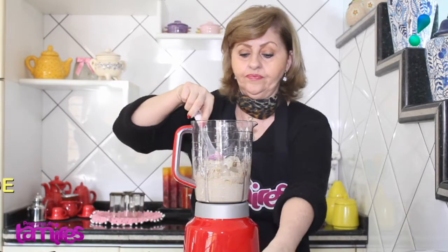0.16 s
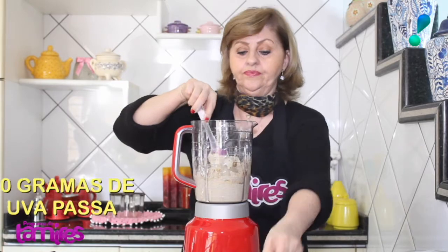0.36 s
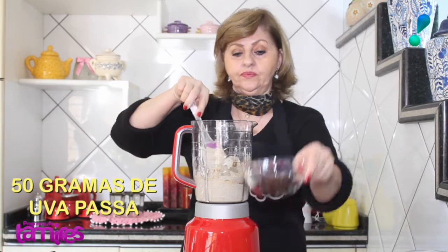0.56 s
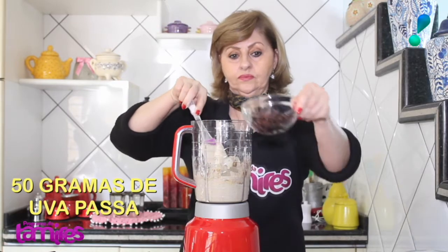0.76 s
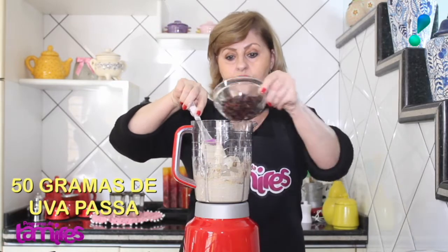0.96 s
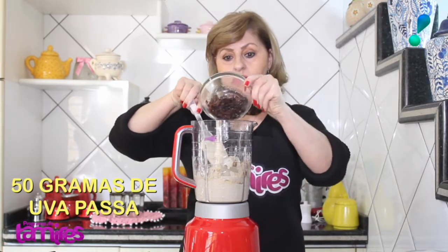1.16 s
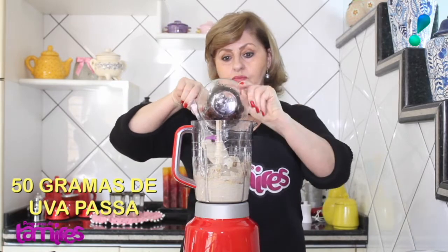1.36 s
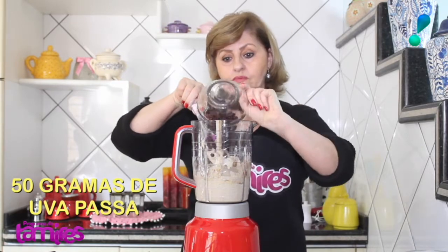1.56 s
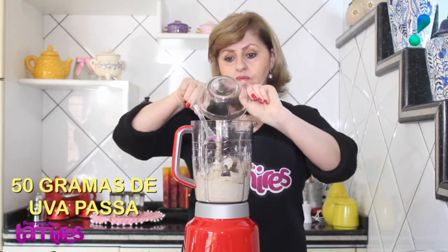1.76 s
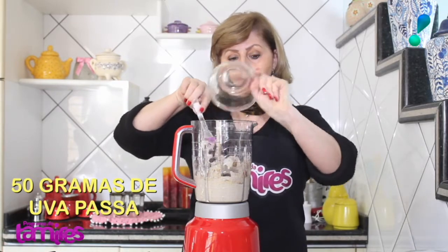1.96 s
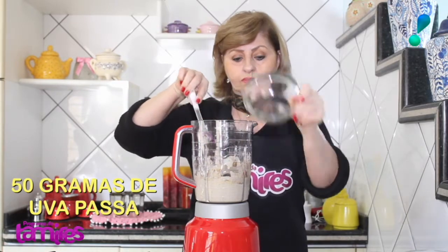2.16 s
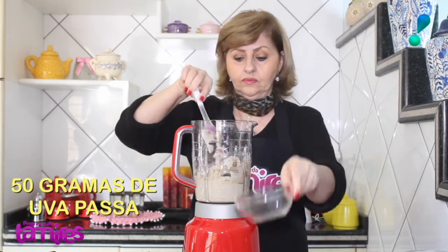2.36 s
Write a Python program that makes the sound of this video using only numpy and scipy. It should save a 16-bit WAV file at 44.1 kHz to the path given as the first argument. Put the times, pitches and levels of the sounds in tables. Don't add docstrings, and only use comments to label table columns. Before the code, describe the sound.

A glass bowl scrapes and rings off a kitchen counter, then a spatula knocks a blender jar

```python
import sys
import numpy as np
from scipy import signal
from scipy.fft import rfft, irfft
from scipy.io import wavfile
from scipy.ndimage import uniform_filter1d

SR = 44100
rng = np.random.default_rng(int(sys.argv[2]) if len(sys.argv) > 2 else 0)


def to_linear_factor(level_db):
    exponent = np.asarray(level_db, float) / 20
    return 10 ** exponent


def inscribe(sig):
    pcm = np.round(np.clip(np.atleast_2d(sig).T, -1, 1) * 32767)
    wavfile.write(sys.argv[1], SR, pcm.astype(np.int16))


N = 105840


def rms_one(x):
    return x / np.sqrt(np.mean(x ** 2) + 1e-20)


def at_hz(points, hz):
    table = np.array(points)
    return np.interp(np.log(hz), np.log(table[:, 0]), table[:, 1])


def shape(x, spectrum):
    hz = np.maximum(np.arange(N // 2 + 1) * SR / N, 1)
    return irfft(rfft(x) * to_linear_factor(at_hz(spectrum, hz)), N)


def colour(x, spectrum):
    return rms_one(shape(x, spectrum))


def butter(x, order, hz, kind="low"):
    return signal.sosfilt(signal.butter(order, hz, kind, fs=SR, output="sos"), x)


def stroke(rows):
    s, db = np.transpose(rows)
    return to_linear_factor(np.interp(np.arange(N) / SR, s, db, left=-200, right=-200))


def hits_at(times, levels_db):
    hits = np.zeros(N)
    hits[(times * SR).astype(int)] = to_linear_factor(levels_db)
    return hits


def die_away(hits, seconds):
    return signal.lfilter([1], [1, -np.exp(-1 / (seconds * SR))], hits + 1e-18)


def grit(per_s, spread_db):
    sizes = to_linear_factor(spread_db * np.minimum(rng.exponential(1, N), 5)) * rng.choice([-1, 1], N)
    return rms_one(sizes * (rng.random(N) < per_s / SR))


def ring(x, hz, t60):
    r = to_linear_factor(-60 / (t60 * SR))
    w = 2 * np.pi * hz / SR
    return signal.lfilter([0, np.sin(w)], [1, -2 * r * np.cos(w), r * r], x + 1e-18)


def ring_modes(x, modes, flip):
    return sum(to_linear_factor(db) * ring(x, hz, t60) * flip ** k for k, (hz, db, t60) in enumerate(modes))


def resonate(x, peaks):
    return sum(to_linear_factor(db) * rms_one(ring(x, hz, 2.2 / width)) * (-1) ** k
               for k, (hz, width, db) in enumerate(peaks))


def strike(times, levels_db, modes, scatter_db, flip=-1):
    out = np.zeros(N)
    vary = rng.standard_normal((len(times), 16))
    for k, (hz, db, t60) in enumerate(modes):
        hits = hits_at(times, levels_db + db + scatter_db * vary[:, k])
        out += ring(hits, hz, t60) * flip ** k
    return out


# (time [s], level [dB])
DRAG_PRESSURE = [(.2225, -59), (.2245, -28.5), (.23, -33.5), (.236, -23.5), (.246, -19), (.288, -14.5),
                 (.32, -24.5), (.425, -34.5), (.445, -49.5)]
# (time [s], level [dB])
DRAG_SPEED = [(.2225, -73.5), (.2245, -41.5), (.231, -47), (.236, -30.5), (.26, -37), (.29, -39.5),
              (.32, -46.5), (.37, -61), (.4, -70)]
# (frequency [Hz], density [dB])
PRESSURE_GRIT = [(60, -70.5), (130, -28), (300, -14.5), (600, -4), (1100, -2), (1650, 1), (2800, -10),
                 (5000, -31.5), (9000, -68.5)]
SPEED_GRIT = [(2000, -19), (3500, 10), (5500, -5), (7500, -21), (9000, -22), (12500, -32), (16000, -29.5)]
# (frequency [Hz], width [Hz], level [dB])
COUNTER = [(673, 53, -9.5), (1390, 36, -6.5), (1610, 190, -3), (1964, 73, -5.5), (2544, 41, -5.5),
           (2840, 29, -9.5), (3150, 84, -18), (3750, 91, -11)]
GLASS = [(5300, 110, -9), (7540, 180, -15.5), (4000, 250, -1)]
# (frequency [Hz], level [dB], t60 [s])
FIRST_TOUCH = [(2000, 1, 0.027), (1590, -14, 0.021)]


def drag():
    push, speed = stroke(DRAG_PRESSURE), stroke(DRAG_SPEED)
    slips, fine = grit(4000, spread_db=0.0), grit(9000, spread_db=4.5)
    rasp = push * to_linear_factor(-1) * colour(slips, PRESSURE_GRIT) + speed * colour(fine, SPEED_GRIT)
    counter = [(hz, 1.4 * width, db) for hz, width, db in COUNTER]
    counter_ring = np.std(push * slips) * to_linear_factor(-13.5) * resonate(push * slips, counter)
    glass_ring = np.std(speed * fine) * to_linear_factor(-4.5) * resonate(speed * fine, GLASS)
    touch = strike(np.array([.2178]), -30.5, FIRST_TOUCH, scatter_db=4.0)
    return rasp + counter_ring + glass_ring + butter(touch, 2, [1200, 2600], "band")


# (time [s], counter [dB], low counter [dB], glass [dB], rim tone [dB])
CATCHES = [(.2255, -23.5, -37, -58, -60.5), (.2338, -20, -27.5, -32.5, -51.5),
           (.2445, -13, -20.5, -35.5, -55.5), (.258, -18.5, -10, -43.5, -46),
           (.266, -20, -16, -52.5, -40.5), (.275, -16, -19, -50.5, -41.5), (.2825, -13, -19, -52, -45),
           (.286, -10, -19, -47.5, -43), (.297, -13.5, -24, -53.5, -59), (.312, -11.5, -25.5, -54, -57),
           (.324, -24, -19.5, -61, -49), (.336, -17.5, -21, -61.5, -43), (.359, -17.5, -27.5, -73, -68),
           (.383, -37.5, -25, -76, -85), (.404, -38, -23, -68, -68.5), (.42, -36.5, -36, -60, -67)]
# (frequency [Hz], level [dB], t60 [s])
SLAB = [(1388, 2, .05), (1612, 0.5, .06), (2074, -5, .05), (2570, -9.5, 0.04), (2840, -9.5, .06),
        (3150, -12, .03)]
SLAB_LOW = [(543.6, -6, 0.11), (654.3, -3.5, .07), (827, -1, .08), (960, -2, 0.051), (1120, -3, 0.042)]
SHEEN = [(9710, -0.5, .016), (10300, 1.5, 0.016), (11100, -5.5, .008), (13300, -8.5, .012),
         (14300, -13, .01), (15200, -3.5, .016)]
RIM_TONE = [(6260, 1, .09), (6540, -3.5, .07)]


def catches():
    s, slab_db, low_db, glass_db, tone_db = np.transpose(CATCHES)
    slab = strike(s, slab_db - 6.5, SLAB, scatter_db=5.0)
    slab = slab + strike(s, low_db - 5, SLAB_LOW, scatter_db=2.5)
    chatter = grit(6000, spread_db=6.5) * die_away(hits_at(s, glass_db - 22.5), seconds=0.014)
    glass = ring_modes(chatter, SHEEN, flip=1) + strike(s, tone_db - 3.5, RIM_TONE, scatter_db=4.5)
    return butter(slab, 2, [450, 3600], "band") + butter(glass, 2, 5000, "high")


# (time [s], level [dB])
SCRAPE = [(1.019, -46), (1.022, -37.5), (1.04, -30), (1.058, -29.5), (1.08, -34.5), (1.1, -37.5),
          (1.112, -42.5), (1.17, -52)]
# (frequency [Hz], level [dB])
SCRAPE_GRIT = [(400, -11), (800, 3), (1500, -0.5), (2400, -2.5), (2900, -5.5), (4000, -6), (10000, -17),
               (16000, -31)]
SINK_LOSS = [(5000, -28), (14000, 5)]
# (frequency [Hz], width [Hz], level [dB])
WALL = [(940, 100, -1), (1564, 92, 6.5), (2350, 250, 5), (3800, 210, -2.5), (5500, 54, -7.5)]
# (time [s], level [dB])
SINGS = [(1.07, -55), (1.095, -56), (1.118, -57), (1.138, -54), (1.15, -56)]
# (frequency [Hz], level [dB], t60 [s])
SING = [(5540, 0, .13), (5700, -1, .13)]


def scrape():
    slips, push = grit(5000, spread_db=1.5), stroke(SCRAPE)
    rasp = colour(slips, SCRAPE_GRIT)
    sunk = np.arange(N) / SR > 1.09
    rasp = rasp - sunk * shape(rasp, SINK_LOSS)
    wall = np.sqrt(np.mean(push ** 2)) * to_linear_factor(-40.5) * resonate(push * slips, WALL)
    return strike(*np.transpose(SINGS), SING, scatter_db=0) + push * rasp + wall


# (time [s], level [dB])
STIR = [(1.021, -55), (1.031, -21.5), (1.07, -17), (1.12, -25), (1.15, -31), (1.24, -35.5), (1.265, -43),
        (1.28, -59), (1.42, -48)]
SHAKE = [(1.67, -68.5), (1.7, -53), (1.755, -48), (1.8, -69), (1.85, -52), (1.95, -75)]
# (time [s], belly [dB], neck [dB], wall [dB])
KNOCKS = [(1.025, -21, -18.5, -50), (1.033, -12, -16, -45), (1.049, -19, -9.5, -30.5),
          (1.056, -7, -13, -28), (1.074, -5, -12, -37), (1.09, -25, -26, -52), (1.101, -24, -22, -53),
          (1.111, -7.5, -16, -56), (1.136, -17, -30.5, -55), (1.148, -21.5, -21, -63),
          (1.165, -16, -32, -64), (1.185, -14, -42, -58), (1.208, -13, -48, -60), (1.2194, -20, -18, -39),
          (1.236, -23, -27, -71), (1.329, -26.5, -25.5, -44.5), (0.619, -37.5, -38, -64),
          (0.292, -18.5, -25, -57)]
# (time [s], base thud [dB], side rap [dB])
THUDS = [(0.291, -40, -59), (1.2207, -44, -14.5), (1.2345, -63, -18.5), (1.258, -70, -23.5),
         (1.3293, -61, -22), (1.343, -70, -27), (1.74, -70, -40), (1.7765, -59, -39.5), (1.811, -56, -28.5),
         (1.838, -38, -33), (1.871, -53, -43)]
# (frequency [Hz], level [dB], t60 [s])
JAR = [(166, -6.5, 0.0819), (221, -3, .07), (242.2, -0.5, 0.08), (285.7, -4, 0.054), (388.9, -11.5, 0.15),
       (460, -7, 0.049), (519, -4, 0.057), (553, -3, 0.057), (666.4, -8, .04)]
RAP = [(257, -7.5, 0.059), (386.3, -2, .08), (462, 0, 0.06), (620, -8.5, 0.038)]
CORNER = [(128, 0.0017, 0.04)]


def jar():
    knock_s, belly_db, neck_db, wall_db = np.transpose(KNOCKS)
    belly = strike(knock_s, belly_db - 9, JAR[:4], scatter_db=-0.5, flip=1)
    neck = strike(knock_s, neck_db - 4.5, JAR[4:], scatter_db=4.5, flip=-0.92)
    wall_modes = [(hz, db, 5.2 / width) for hz, width, db in WALL[:3]]
    wall = strike(knock_s, wall_db - 3.5, wall_modes, scatter_db=0)
    shove = grit(500, spread_db=4.0)
    unit = np.std(ring_modes(shove, JAR, flip=-1))
    shaken = ring_modes(shove * (stroke(STIR) + stroke(SHAKE)) / unit, JAR, flip=-1)
    thud_s, base_db, rap_db = np.transpose(THUDS)
    base = butter(strike(thud_s, base_db, CORNER, scatter_db=-3.0), 2, 200)
    rap = strike(thud_s, rap_db - 6, RAP, scatter_db=2.0, flip=0.98)
    soft = butter(belly + neck + shaken + rap, 3, 806)
    return butter(soft, 4, 193, "high") + wall + base


# (time [s], edge [dB], rim [dB], glass [dB], crack [dB])
CLICKS = [
    (0.616, -25, -51, -68, -33),
    (0.996, -57, -43.5, -59, -39.5),
    (1.3292, -63, -69, -49.5, -40.5),
    (1.713, -64, -78, -59.5, -54),
    (1.7767, -67, -75, -56.5, -60),
    (1.8108, -60, -71, -40.5, -45),
    (1.8403, -74, -47.5, -69, -70),
    (1.2205, -49, -62, -63, -56),
]
# (frequency [Hz], level [dB], t60 [s])
EDGE = [(1006, -9, 0.07), (1350, -9.5, 0.033), (2350, -4.5, 0.013), (3144, 1, 0.029), (4310, -5.5, 0.017),
        (5520, 1, 0.016), (6640, -1.5, 0.0095)]
RIM = [(3820, 5.5, 0.02), (4300, 3, 0.01), (1510, -5, 0.03)]
BOWL = [(6580, -1.5, 0.016), (7800, 0.5, 0.016), (10070, 4, 0.022), (13400, -1, .015), (5830, -11, .015)]


def clicks():
    s, edge_db, rim_db, glass_db, crack_db = np.transpose(CLICKS)
    crack_colour = [(300, 8), (1500, 6), (7000, -5.5), (11000, -16.5), (16000, -33.0)]
    noise = colour(rng.standard_normal(N), crack_colour)
    crack = noise * die_away(hits_at(s, crack_db), seconds=0.0068)
    edge = strike(s, edge_db - 6, EDGE, scatter_db=0.0)
    rim = strike(s, rim_db, RIM, scatter_db=0)
    return crack + edge + rim + strike(s, glass_db - 5, BOWL, scatter_db=2.5)


# (frequency [Hz], t60 [s])
ROOM = [(150, 0.72), (500, 0.5764), (1500, 0.4833), (3000, 0.5255), (6000, 0.77), (10000, 0.6)]
# (frequency [Hz], level [dB])
ROOM_GAIN = [(150, -9.5), (600, -8.5), (2000, -8.5), (5000, -12.5), (12000, -23)]


def room(x):
    t = np.arange(SR) / SR
    white, tail = rng.standard_normal((2, SR)), 0
    edges_hz = 40 * 2 ** np.arange(0, 8.8, .5)
    for k, (low, high) in enumerate(zip(edges_hz, edges_hz[1:])):
        hz = np.sqrt(low * high)
        t60 = at_hz(ROOM, hz)
        decay = to_linear_factor(-60 * t / t60) + to_linear_factor(-38 - 60 * t / 2)
        gain = to_linear_factor(at_hz(ROOM_GAIN, hz)) * np.sqrt(13.8 / t60 / SR)
        tail = tail + butter(white[k % 2], 2, [low, high], "band") * gain * decay
    tail = tail * np.clip(t / .005 - .3, 0, 1)
    return signal.fftconvolve(x, tail)[:N]


# (time [s], level [dB])
SLIDE = [(0, -58.5), (.06, -62), (.1, -61.5), (.19, -67.5), (.24, -44)]
BRUSH = [(2.1, -85), (2.125, -69.5), (2.17, -67), (2.189, -86)]
# (frequency [Hz], width [Hz], level [dB])
SLIDE_PEAKS = [(1177, 150, -1), (1394, 72, -6.5), (1625, 60, -7)]
BRUSH_PEAKS = [(1400, 90, 0.23), (2150, 83, -1), (3080, 90, -2)]


def soft_rubs():
    slide = stroke(SLIDE) * rms_one(resonate(rng.standard_normal(N), SLIDE_PEAKS))
    return slide + stroke(BRUSH) * rms_one(resonate(rng.standard_normal(N), BRUSH_PEAKS))


# (frequency [Hz], density [dB])
FLOOR = [(40, -33), (90, -21), (130, -12), (350, -3.5), (650, -14), (1000, -16.5), (8000, -26),
         (16000, -31.5)]
# (frequency [Hz], width [Hz], level [dB])
HUM = [(100, 8, -79), (215, 12, -70), (236, 12, -76.5), (344, 20, -67), (595, 44, -73)]


def floor():
    return to_linear_factor(-64) * colour(rng.standard_normal(N), FLOOR) + resonate(rng.standard_normal(N), HUM)


def gate(x):
    t = np.arange(N) / SR
    level_db = 10 * np.log10(np.abs(uniform_filter1d(x ** 2, size=256)) + 1e-12)
    loud = np.clip((level_db + 60) / 10, 0, 1)
    close_per_s, open_s = 3.86, 0.031
    held = np.maximum.accumulate(loud + close_per_s * t) - close_per_s * t
    r = np.exp(-1 / (open_s * SR))
    return to_linear_factor(5 * signal.lfilter([1 - r], [1, -r], np.clip(held, 0, 1)))


# (frequency [Hz], side minus mid [dB])
PORTS = [(1500, -56.5), (4000, -20.5), (15000, -8)]
# (frequency [Hz], density [dB])
SIDE_FLOOR = [(40, -22), (250, -3.5), (3000, -5.5), (10000, -7.5), (16000, -16)]


def scene():
    bowl, stir, ticks = drag() + catches(), scrape() + jar(), clicks()
    mid = bowl + stir + ticks + room(bowl + to_linear_factor(-4) * stir + to_linear_factor(-9) * ticks)
    mid = butter(mid, 4, 85, "high")
    smear = rng.standard_normal(512) * np.exp(-np.arange(512) / (.002 * SR))
    smear = smear / np.linalg.norm(smear)
    apart = shape(np.convolve(stir + ticks, smear)[:N], PORTS)
    lift = gate(mid)
    side = apart + lift * to_linear_factor(-69.5) * colour(rng.standard_normal(N), SIDE_FLOOR)
    return mid + lift * (floor() + soft_rubs()) + side * np.array([[1], [-1]])


def low_pass(x):
    return signal.sosfilt(signal.butter(12, 16650, fs=SR, output="sos"), x)


def record(dry):
    treble_cut = signal.cheby2(10, 60, 16500, fs=SR, output="sos")
    heard = signal.sosfilt(treble_cut, butter(dry, 2, 70, "high"))
    return low_pass(heard)


dry = scene()
out = record(dry)
inscribe(out)
```